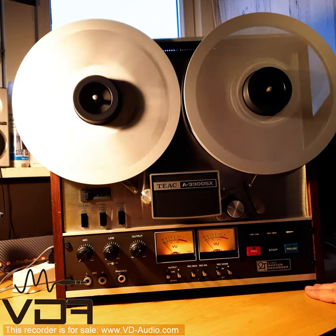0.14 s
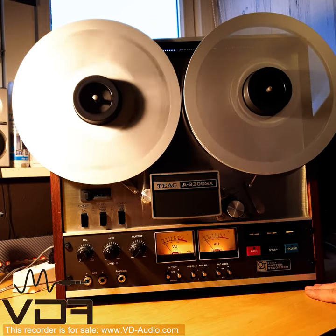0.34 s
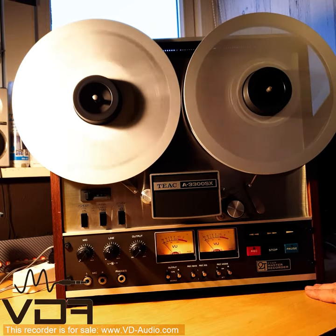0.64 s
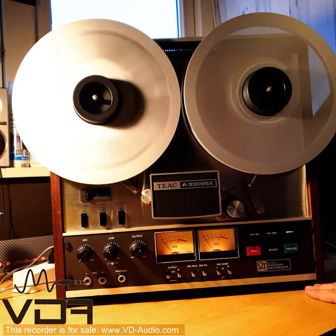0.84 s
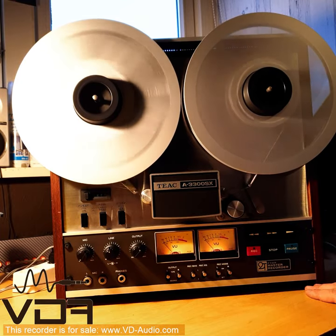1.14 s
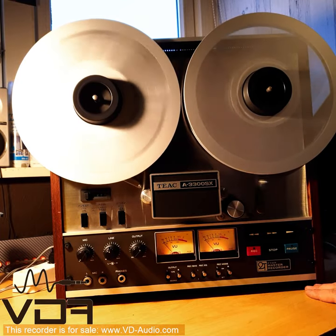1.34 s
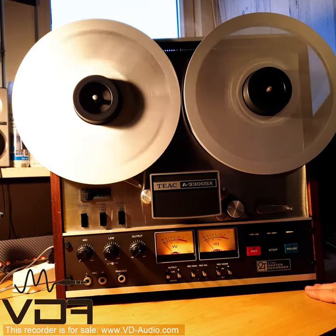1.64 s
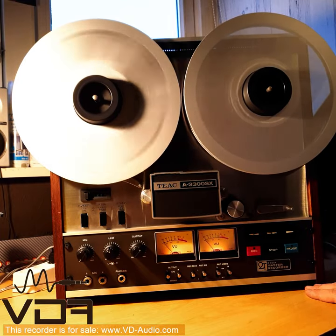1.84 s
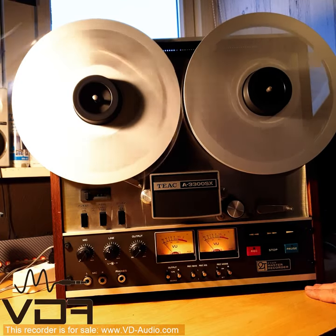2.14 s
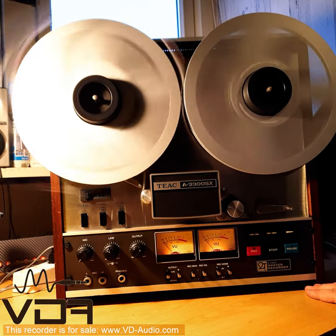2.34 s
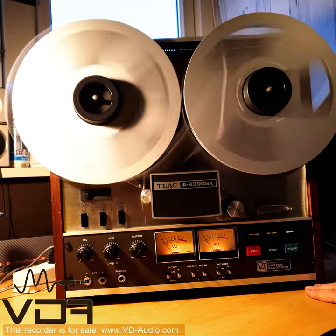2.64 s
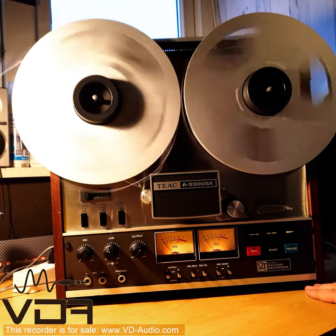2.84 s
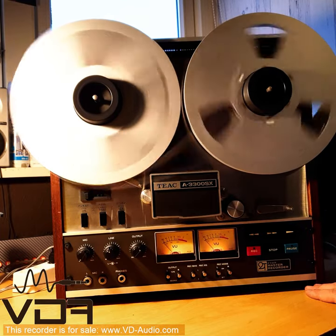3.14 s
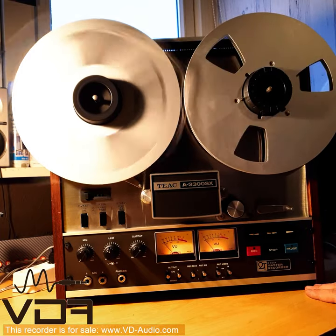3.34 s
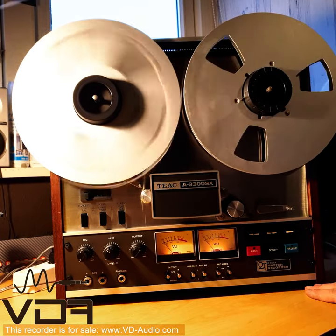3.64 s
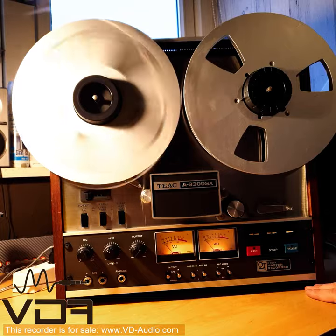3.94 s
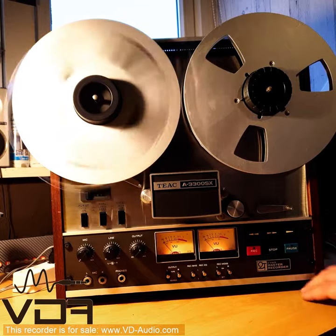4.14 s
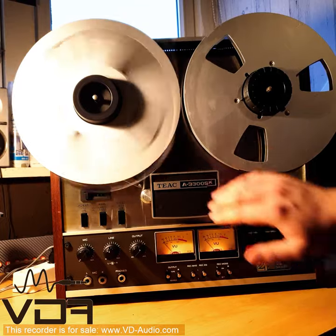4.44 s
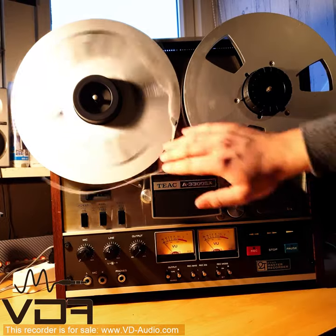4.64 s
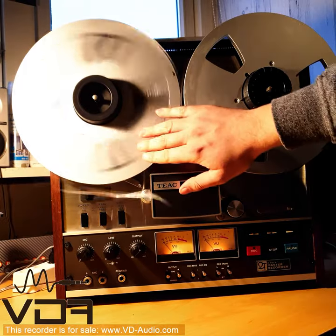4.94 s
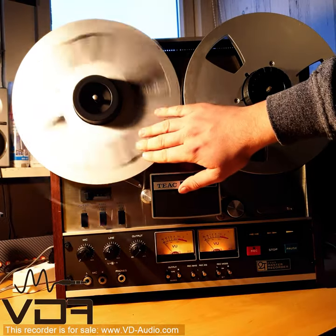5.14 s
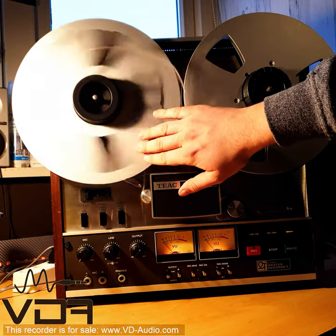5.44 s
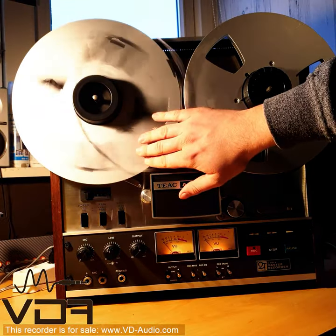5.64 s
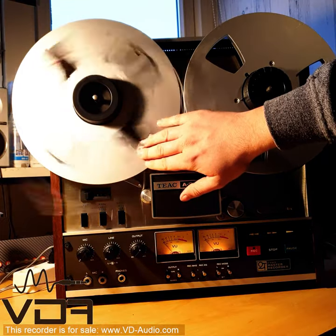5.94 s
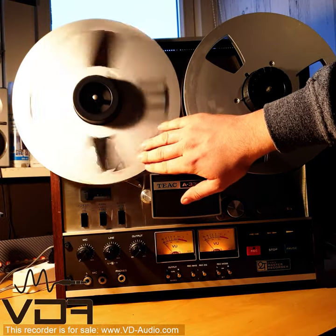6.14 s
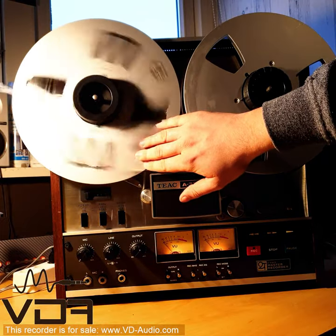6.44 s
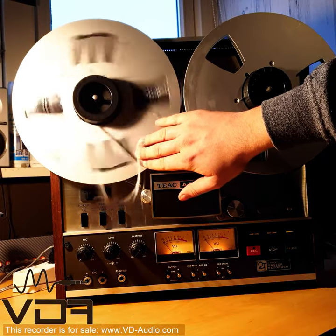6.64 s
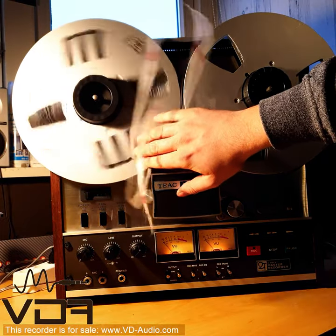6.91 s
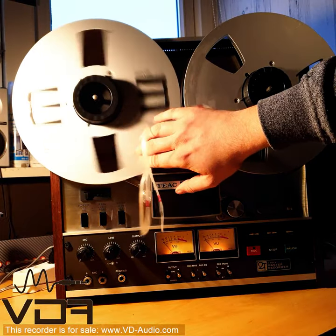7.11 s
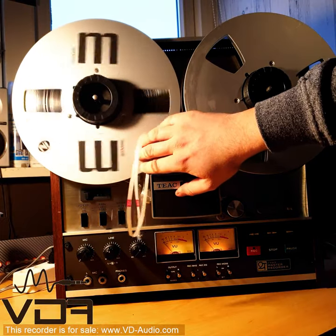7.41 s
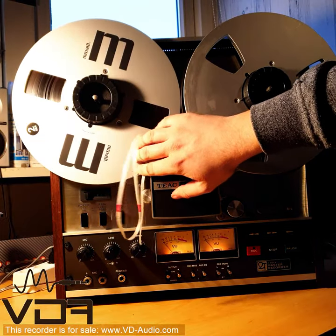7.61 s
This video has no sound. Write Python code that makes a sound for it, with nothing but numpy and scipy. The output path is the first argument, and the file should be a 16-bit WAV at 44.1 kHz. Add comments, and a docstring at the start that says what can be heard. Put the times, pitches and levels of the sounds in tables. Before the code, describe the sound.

Humming, whirring tape runs off its reel with clunks, then flaps and swishes ever more slowly as a hand rubs the reel to rest.

```python
"""An open-reel tape deck rewinds at full speed, close to a stereo microphone in a small room, a little right.
Its motors hum and the tape whirs until it runs off the hub and the transport clunks off.
The loose end whips round with the coasting reel, slapping and sweeping over the deck a few times a second.
A hand rubs on the metal flange and brakes the reel to rest."""
import sys
import numpy as np
from scipy import signal
from scipy.fft import rfft, irfft, next_fast_len
from scipy.io import wavfile
from scipy.ndimage import uniform_filter1d, map_coordinates

SR = 44100
rng = np.random.default_rng(int(sys.argv[2]) if len(sys.argv) > 2 else 0)


def store_wav(level_fs):
    """Save 16-bit WAV to argv[1]."""
    pcm = np.round(np.clip(np.atleast_2d(level_fs), -1, 1) * 32767)
    wavfile.write(sys.argv[1], SR, pcm.T.astype(np.int16))


N = 342657

# hum lines of the motors: (frequency [Hz], relative level [dB])
HUM_LINES = [(64.6, -53.5), (102.3, -66), (129.2, -54.5), (193.8, -69.5), (323.0, -78.5), (500.6, -67),
             (554.5, -65)]
# tape running through the guides: (frequency [Hz], density [dB])
WHIR_SPECTRUM = [(47, -7.5), (80, -5.5), (97, -17.5), (130, -5.5), (166, -12.5), (320, -6), (420, -10.5),
                 (499, -5.5), (605, -12.5), (706, -6), (1590, -0.5), (3850, -17), (4940, -20.5),
                 (6990, -38), (8000, -43), (10400, -66), (17600, -120)]
# tape peeling off the hub, fingers gliding on metal: (frequency [Hz], density [dB])
HISS_SPECTRUM = [(1500, -16), (3500, -12.5), (7000, -11), (10000, -7), (13300, -0.5), (16000, -13)]
# room tone: (frequency [Hz], density [dB])
AIR_SPECTRUM = [(20, -19), (35, -26), (48, 9.5), (65, -4), (95, -1), (180, -8), (400, -20.5), (1000, -20.5),
                (3000, -33.5), (16000, -28)]
# the last turns slip on the hub: (time [s], level [dB])
HUB_SLIPS = [(1.128, -44), (1.315, -36.5)]
# the loose end swishes in, lands, drags and flicks its tip off: (landing [s], tip [s], swish rise [s],
# landing level [dB], drag level [dB], tip level [dB], relative body [dB], slap left minus right [dB])
TAPE_LASHES = [(1.344, 1.3702, 0.019, -12.5, -29, -13.5, -28, 3),
               (1.4597, 1.468, 0.0043, -15, -53, -36, -6.5, -2.5),
               (1.532, 1.547, 0.0044, -24.5, -29, -17, -4.5, -6.5),
               (1.636, 1.672, 0.014, -22.5, -31.5, -38, 0, 4.5),
               (1.7368, 1.763, 0.0053, -12, -30.5, -21, -6, -1),
               (1.829, 1.8603, 0.013, -41, -35, -19.5, -11, -0.5),
               (1.997, 2.04, .003, -26.5, -44, -43.5, -3, -0.5),
               (2.0431, 2.057, .004, -12.5, -32, -26, -2, 0),
               (2.23, 2.264, .005, -30.5, -47.5, -26, -6, 0.5),
               (2.301, 2.359, 0.0048, -37.5, -45, -29.5, -8, -3.5),
               (2.558, 2.611, .016, -22.5, -40, -39.5, -11, -1.5),
               (2.733, 2.769, 0.0035, -28.5, -45, -46.5, -3, 2.5),
               (2.9178, 2.9724, .001, -24, -38, -17, -6.5, -4),
               (3.135, 3.142, .002, -32.5, -63.5, -45.5, 0, -6),
               (3.2147, 3.232, .002, -30, -50.5, -46, -3, -1.5),
               (3.337, 3.369, .011, -21, -34.5, -41.5, -8, -6.5),
               (3.6224, 3.657, .006, -44, -54.5, -50, -2.5, -4.5),
               (3.75, 3.7707, .002, -30, -34.5, -27.5, -8, -1.5),
               (3.912, 3.9322, .005, -38.5, -52.5, -26.5, -2, -3),
               (3.973, 3.986, .01, -32, -56, -49, 1, -3),
               (4.006, 4.0225, .002, -28.5, -44.5, -23.5, -10.5, 0),
               (4.0573, 4.088, 0.0083, -23.5, -39.5, -23.5, -8.5, 4.5),
               (4.256, 4.294, 0.025, -29.5, -50, -27, -5.5, -3.5),
               (4.329, 4.34, .005, -28.5, -48.5, -41, -5.5, 3),
               (4.5812, 4.603, 0.0057, -22.5, -49.5, -46, -10.5, -4.5),
               (4.651, 4.758, 0.0086, -42.5, -53, -35, -7, -6.5),
               (4.8916, 4.892, 0.0009, -46, -72, -50.5, 7.5, -5),
               (4.96, 4.9756, .002, -38, -45.5, -32.5, -6, -2),
               (5.176, 5.208, 0.0054, -27.5, -50.5, -52, -3.5, -2.5),
               (5.39, 5.4251, 0.0069, -32.5, -45.5, -28, -6.5, -1.5),
               (5.678, 5.7054, 0.0011, -23.5, -42, -27, -14.5, 1),
               (5.8775, 5.925, .006, -37.5, -50, -31, -3.5, -4.5),
               (6.208, 6.262, .015, -39.5, -50, -32, -10, -11),
               (6.4708, 6.526, 0.015, -32, -42.5, -35.5, -26.5, 3.5),
               (6.7924, 6.823, 0.0098, -22.5, -47, -45, -2, 4.5),
               (7.1084, 7.142, .025, -29, -53, -47.5, -5.5, -3.5),
               (7.376, 7.372, .03, -48, -47.5, -39, -15, 6),
               (7.465, 7.513, 0.027, -40, -53.5, -29.5, 1.5, 0.5)]
# bright scrape of dragging film: (frequency [Hz], density [dB])
SCRAPE_SPECTRUM = [(700, -29), (2000, -7.5), (3500, -4), (6000, 1.5), (9000, -1.5), (10500, 2.5),
                   (13000, 1), (16000, -3)]
# papery body of the film: (frequency [Hz], density [dB])
PAPERY_SPECTRUM = [(150, -21), (500, -21), (780, -4.5), (1080, -7), (1420, -1.5), (1560, -4), (1750, -2.5),
                   (1950, -1), (2250, 0), (2500, -2), (2900, 1.5), (4000, -2), (6500, -15.5)]
# friction of the fluttering end and of skin: (frequency [Hz], density [dB])
FRICTION_SPECTRUM = [(300, -31.5), (640, -30.5), (800, -22.5), (1120, -21), (1450, -13.5), (1900, -27),
                     (2230, -1.5), (2500, -13), (2800, -1), (3600, -7), (6000, 1), (9000, -1), (11000, 2.5),
                     (16000, -2)]
# rubbing as the hand presses on the flange: (time [s], level [dB])
HAND_RUB = [(5.3, -65.5), (5.42, -57), (5.8, -62), (6.04, -53.5), (6.42, -56), (6.82, -49), (6.96, -65.5),
            (7.07, -57), (7.22, -57.5), (7.33, -50), (7.47, -48)]
# film cracking against the deck: (frequency [Hz], density [dB])
CRACK_SPECTRUM = [(700, -35.5), (2000, -17), (3500, -12.5), (7000, -1.5), (9000, -4.5), (11000, 0.5),
                  (13500, 1), (16000, -3)]
# knocks of the transport: (time [s], thud level [dB], clack relative to thud [dB])
TRANSPORT_KNOCKS = [(1.354, -42.5, 17), (1.375, -36, 12.5), (1.596, -48.5, 26.5), (1.63, -33.5, 10),
                    (1.663, -38.5, 2.5), (1.719, -47.5, 18), (1.917, -42, -14), (2.043, -39, 13),
                    (2.193, -37, -14), (2.303, -44, -23), (2.363, -39.5, -11), (2.493, -41, -21.5),
                    (2.874, -46.5, -6.5), (3.345, -46.5, -9), (3.404, -49.5, -23), (4.031, -46, -17)]
# low thud of a knock: (frequency [Hz], density [dB])
THUD_SPECTRUM = [(40, -15), (130, -14.5), (240, 0.5), (340, -3.5), (450, -6.5), (850, -7.5), (1250, -26),
                 (3000, -39)]
# hard clack of a knock: (frequency [Hz], density [dB])
CLACK_SPECTRUM = [(200, -9), (550, -6.5), (850, -4), (1080, 1.5), (1400, 5), (1750, 1), (2400, -4.5),
                  (3500, -7), (6000, -17), (12000, -44.5)]
# rumbling chassis: (frequency [Hz], density [dB])
CHASSIS_SPECTRUM = [(30, -20.5), (70, -21), (130, -6), (185, -5.5), (235, -3), (320, -10), (380, -16),
                    (500, -8.5), (700, -17), (1000, -17.5), (3000, -24)]
# hollow cabinet under braking: (frequency [Hz], density [dB])
CABINET_SPECTRUM = [(90, -21), (150, 2.5), (220, -17.5), (300, 1), (348, 4), (400, -6.5), (470, -3.5),
                    (520, -0.5), (700, -12), (2000, -28)]
# the whole deck thumps on the table: (time [s], level [dB])
DECK_JOLTS = [(1.635, -49), (1.682, -40), (2.874, -53), (4.028, -44), (4.069, -44.5), (4.639, -59),
              (4.712, -60)]
# modes of the table top: (frequency [Hz], level [dB], t60 [s])
TABLE_TOP_MODES = [(52, -16, 0.16), (75.6, -2, 0.14), (112, 0, 0.11), (152.5, -4.5, 0.13),
                   (232, -6.5, 0.37), (290, -7, 0.14)]
# the tape tip catches the reel: (time [s], level [dB], pitch favoured by the place of contact [Hz])
RIM_TOUCHES = [(2.046, -39, 1760), (3.345, -47.5, 1370), (3.765, -50, 1430), (4.01, -54, 2470),
               (4.022, -46.5, 2430), (4.33, -56, 2650), (7.46, -55, 2730)]
# modes of the metal flange: (frequency [Hz], level [dB], t60 [s])
FLANGE_MODES = [(810, 5.5, 0.41), (1437, -9, 0.63), (1730, 3, 0.15), (1780, -11, 0.44), (1883, 8.5, 0.11),
                (2220, 10.5, 0.075), (2817, -5, 0.06), (4410, 1, 0.2)]
# reverberation of the small room: (frequency [Hz], t60 [s])
ROOM_DECAY = [(150, 0.61), (600, 0.38), (2000, 0.31), (6000, 0.28), (15000, 0.13)]

RUNOUT_S, BRAKE_S, MOTORS_OFF_S, HAND_ON_S, STOP_S = 1.308, 1.628, 1.85, 4.5, 7.55
PRESS_S, LIFT_S = 0.0028, 0.024  # the tape lies flat after landing; the drag lets go


def amp(db):
    """Decibels to gain."""
    return 10 ** (np.asarray(db) / 20)


def unit(x):
    """Scaled to rms 1."""
    return x / np.sqrt(np.mean(x ** 2) + 1e-20)


def along(points, hz):
    """(Hz, value) points read on a log axis."""
    f, v = np.transpose(points)
    return np.interp(np.log(hz + 1), np.log(f + 1), v)


def clock():
    """The time of every sample."""
    return np.arange(N) / SR


def wobble(rate):
    """A smooth random curve, rate knots a second."""
    return map_coordinates(rng.standard_normal(int(N * rate / SR) + 4), [np.arange(N) * rate / SR])


def colour(x, spectrum, size=4096):
    """A causal filter of unit energy with the given spectrum."""
    cepstrum = irfft(np.log(amp(along(spectrum, np.fft.rfftfreq(size, 1 / SR)))))
    cepstrum[1:size // 2] *= 2
    cepstrum[size // 2 + 1:] = 0
    kernel = irfft(np.exp(rfft(cepstrum)))
    return signal.oaconvolve(x, kernel[None] / np.linalg.norm(kernel), axes=1)[:, :N]


def noise(spread):
    """Stereo noise of rms 1; spread is the side-to-mid ratio."""
    mid, side = rng.standard_normal((2, N))
    return unit(np.array([mid + spread * side, mid - spread * side]))


def crinkle(spread, grain_db, rate):
    """Noise that comes in tiny snaps, as thin film buckles."""
    return unit(noise(spread) * amp(grain_db * np.tanh(wobble(rate))))


def patchy(x, depth_db, bins=5, frames=18):
    """Shifting resonances: bending film and moving fingers favour ever-changing pitches."""
    spectra = signal.stft(x, nperseg=512)[2]
    field = uniform_filter1d(rng.standard_normal(spectra.shape[1:]), bins, 0)
    field = uniform_filter1d(field, frames, 1)
    return signal.istft(spectra * amp(depth_db * unit(field)), nperseg=512)[1][:, :N]


def add(track, s, shape):
    """Lay a shape into a track at time s."""
    start = max(round(s * SR), 0)
    part = track[..., start:start + shape.shape[-1]]
    part += shape[..., :part.shape[-1]]


def blow(decay, attack):
    """The envelope of one contact, peak 1."""
    t = np.arange(SR // 6) / SR
    shape = (1 - np.exp(-t / attack)) * np.exp(-t / decay)
    return shape / shape.max()


def fading(start, db_per_s):
    """A gain of 1 that falls steadily after start."""
    return amp(-db_per_s * np.maximum(clock() - start, 0))


def held(s, length, rise, fall):
    """An envelope that builds up to time s, holds for length and dies away."""
    t = clock() - s
    return np.exp(-np.minimum(np.maximum(-t / rise, 0) + np.maximum((t - length) / fall, 0), 20))


def motors():
    """The spinning motors hum in slightly unsteady lines until they cut out."""
    t = clock() + 0.000098 * wobble(5.1)
    lines = sum(amp(db + 0.33 * wobble(5)) * np.sin(2 * np.pi * (hz * t + rng.random()))
                for hz, db in HUM_LINES)
    return amp(-57) * unit(lines) * fading(MOTORS_OFF_S, db_per_s=39)


def winding(flutter_hz=21.5, swell_s=0.28):
    """Tape whirs through the guides and hisses off the emptying hub, fluttering as the reel turns."""
    flutter = amp(0.4 * np.sin(2 * np.pi * flutter_hz * clock()) + 0.4 * wobble(40))
    whir = colour(noise(spread=0.56), WHIR_SPECTRUM) * amp(-48) * fading(MOTORS_OFF_S, db_per_s=64.5)
    emptiness = np.exp(np.minimum(clock() - RUNOUT_S, 0) / swell_s)
    peel = amp(-57 + 17 * emptiness) * fading(RUNOUT_S, db_per_s=151)
    hiss = colour(crinkle(spread=1.0, grain_db=1.5, rate=590), HISS_SPECTRUM) * peel
    return (whir + hiss) * flutter


def room_tone():
    """Quiet, low room air around the microphone."""
    return amp(-73.5) * colour(noise(spread=0.26), AIR_SPECTRUM)


def snaps(per_s=38):
    """A gain that leaps briefly at random, as dragging film buckles."""
    chance, size = rng.random((2, N))
    kicks = (chance < per_s / SR) * size ** 2
    return 1 + amp(3) * signal.oaconvolve(kicks, blow(0.0009, attack=0.00032))[:N]


def sweeps(lean=0.37):
    """The last turns scrape on the hub; then each lash drags over the deck, lifts off and settles."""
    scrape = sum(amp(db) * held(s, 0.018, PRESS_S, LIFT_S) for s, db in HUB_SLIPS)
    body = scrape * amp(-4)
    for landing, tip, swish, landing_db, drag_db, tip_db, body_db, _ in TAPE_LASHES:
        progress = np.interp(clock(), [landing, tip], [-0.5, 0.5])
        pressure = amp(drag_db + lean * (tip_db - landing_db) * progress)  # leans to the stronger slap
        drag = pressure * held(landing + PRESS_S, tip - landing - PRESS_S, swish, LIFT_S)
        settle = amp(drag_db - 19.5) * held(tip, 0, PRESS_S, fall=0.12)  # slack tape rustles on
        scrape = np.maximum(scrape, drag + settle)
        body = np.maximum(body, drag * amp(body_db) + settle)
    buckling = snaps()
    bright = colour(scrape * buckling * crinkle(spread=1.0, grain_db=1.5, rate=450), SCRAPE_SPECTRUM)
    papery = colour(body * buckling * crinkle(spread=0.54, grain_db=5.5, rate=300), PAPERY_SPECTRUM)
    return amp(1) * bright + amp(-2) * patchy(papery, depth_db=2.0)


def rubbing(flick_count=50, glide_rise_s=0.99):
    """Friction grains in uneven patches from the fluttering end and the braking hand, with stray flicks."""
    flicks = np.zeros(N)
    for when, size in rng.random((flick_count, 2)):
        add(flicks, 2.6 + 3.2 * when, amp(13 - 10 * size) * blow(0.0017, attack=0.0006))
    flutter = amp(-53.5) * (clock() > RUNOUT_S) * fading(RUNOUT_S, db_per_s=4.5)
    hand = amp(np.interp(clock(), *np.transpose(HAND_RUB))) * (clock() > HAND_ON_S)
    turning = fading(STOP_S, db_per_s=510.5)
    friction = np.hypot(flutter, hand) * turning * amp(1.5 * wobble(28))
    grains = friction * (1 + flicks) * crinkle(spread=0.91, grain_db=5.5, rate=1300)
    rustle = patchy(colour(grains, FRICTION_SPECTRUM), depth_db=2.6)
    # gliding fingers leave a fine hiss that fades as the flange slows
    touch = np.clip((clock() - HAND_ON_S) / glide_rise_s, 0, 1) ** 4
    glide = amp(-57) * touch * fading(HAND_ON_S + glide_rise_s, db_per_s=7.5) * turning
    return amp(2.5) * rustle + colour(glide * noise(spread=1.0), HISS_SPECTRUM)


def slaps():
    """Landing and tip of each lash: a bright crack of the film with a papery body under it."""
    crack, body = np.zeros((2, 2, N))
    for landing, tip, _, landing_db, _, tip_db, body_db, pan_db in TAPE_LASHES:
        for s, db in (landing, landing_db), (tip, tip_db):
            slack = np.clip((-19.5 - db) / 14, 0, 1)  # a light touch lands slackly: slower and softer
            shape = blow(0.003 + 0.0003 * slack, attack=0.0003 + 0.0005 * slack)
            shape = shape * amp(db - 3.7 * slack + np.array([[pan_db], [-pan_db]]) / 2)
            add(crack, s, shape)
            add(body, s, shape * amp(body_db - 10))  # a slap is thinner than the drag
    bright = colour(crack * crinkle(spread=1.0, grain_db=7.0, rate=1400), CRACK_SPECTRUM)
    papery = colour(body * noise(spread=1.0), PAPERY_SPECTRUM)
    return amp(-1) * bright + amp(-1.5) * papery


def chassis_rumble():
    """The empty reel rumbles as it runs down; lashes shake the chassis, less once the hand is on."""
    coast = amp(-53.5) * held(BRAKE_S, N / SR, rise=0.25, fall=1) * fading(BRAKE_S + 0.43, db_per_s=26)
    shake = sum(amp(drag_db - 17) * held(landing, tip - landing, PRESS_S, fall=0.046)
                for landing, tip, _, _, drag_db, *_ in TAPE_LASHES)
    drive = np.hypot(coast, shake * fading(HAND_ON_S, db_per_s=15))
    return colour(drive * crinkle(spread=0.059, grain_db=10.5, rate=70), CHASSIS_SPECTRUM)


def knocks():
    """Arm, brakes and loose reels knock in the transport, each with a thud and a clack."""
    thud, clack = np.zeros((2, N))
    for s, db, clack_db in TRANSPORT_KNOCKS:
        shape = amp(db) * blow(0.0059, attack=0.00024)
        add(thud, s, shape)
        add(clack, s, shape * amp(clack_db))
    thuds = colour(thud * noise(spread=0.23), THUD_SPECTRUM)
    return thuds + colour(clack * noise(spread=0.53), CLACK_SPECTRUM)


def brakes():
    """The brakes drop in and the hollow cabinet booms."""
    shudder = np.zeros(N)
    add(shudder, BRAKE_S, amp(-33) * blow(0.034, attack=0.018))
    return colour(shudder * noise(spread=0.24), CABINET_SPECTRUM)


def table_thumps():
    """Heavier jolts set the table top under the deck ringing."""
    out, t = np.zeros(N), np.arange(SR // 2) / SR
    for s, db in DECK_JOLTS:
        onset = amp(db) * (1 - np.exp(-t / 0.003))
        for hz, mode_db, t60 in TABLE_TOP_MODES:
            decay = amp(mode_db + rng.normal(0, 0.78) - 60 * t / t60)
            add(out, s, onset * decay * np.sin(2 * np.pi * (hz * t + rng.random())))
    return out


def flange_pings():
    """The tape tip pings the metal flange; the place of contact favours the modes near one pitch."""
    out, t = np.zeros(N), np.arange(SR * 2 // 3) / SR
    for s, db, near_hz in RIM_TOUCHES:
        for hz, mode_db, t60 in FLANGE_MODES:
            share_db = -60 * np.log2(hz / near_hz) ** 2 + rng.normal(0, 1.5)
            decay = amp(db + mode_db + share_db - 60 * t / t60)
            add(out, s, decay * np.sin(2 * np.pi * hz * t))
    return out


def from_right(x, lag_samples):
    """The left microphone hears the deck a few samples after the right."""
    return np.array([np.roll(x[0], lag_samples), x[1]])


def room(x, wet_db, delay_samples=130, alike_below_hz=550):
    """The walls return a diffuse tail to each microphone, alike in the bass."""
    hz, t, spectra = signal.stft(rng.standard_normal((2, SR // 2)), SR, nperseg=256)
    apart = hz[:, None] ** 2 / (hz[:, None] ** 2 + alike_below_hz ** 2)
    spectra[1] = np.sqrt(1 - apart ** 2) * spectra[0] + apart * spectra[1]
    decay = amp(-60 * t / along(ROOM_DECAY, hz)[:, None])
    tail = signal.istft(spectra * decay, SR, nperseg=256)[1]
    tail = np.pad(tail / np.linalg.norm(tail[0]), ((0, 0), (delay_samples, 0)))
    mixed = x + 0.39 * np.roll(x[::-1], delay_samples, axis=1)  # each side is thrown across to the other
    return x + amp(wet_db) * signal.fftconvolve(mixed, tail, axes=1)[:, :N]


def scene():
    """The deck stands close by, a little right of the microphones, over quiet room tone."""
    tape = from_right(slaps() + sweeps() * amp([[-2], [2]]) + flange_pings(), lag_samples=3)
    machine = chassis_rumble() + knocks() + brakes() + winding()
    deck = from_right(machine, lag_samples=5) * amp([[-1.6], [1.6]])
    friction = rubbing() * amp([[-0.7], [0.7]])
    bass = (motors() + table_thumps()) * amp([[-1.4], [1.4]])
    air = room_tone()
    return room(tape + friction, wet_db=-6.5) + room(deck, wet_db=-7.0) + bass + air


def record(dry):
    """The microphone rolls off the deepest bass and keeps nothing above its band limit."""
    low_cut_hz, top_hz = 35.0, 15900
    size = next_fast_len(N + SR // 2)
    hz = np.fft.rfftfreq(size, 1 / SR)
    low_cut = hz ** 4 / np.sqrt(hz ** 8 + low_cut_hz ** 8)
    return irfft(rfft(dry, size) * low_cut * (hz < top_hz), size)[:, :N]


dry = scene()
out = record(dry)
store_wav(out)
```